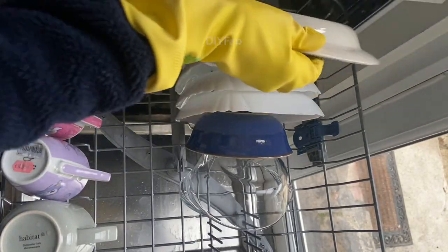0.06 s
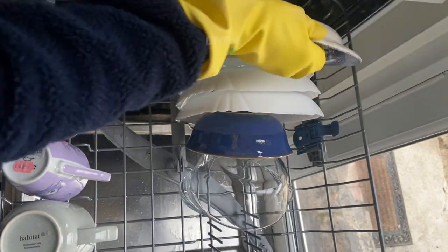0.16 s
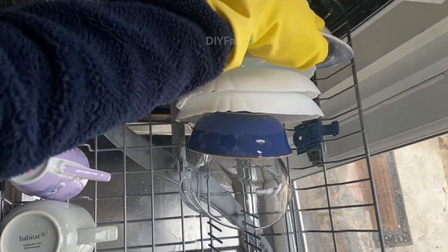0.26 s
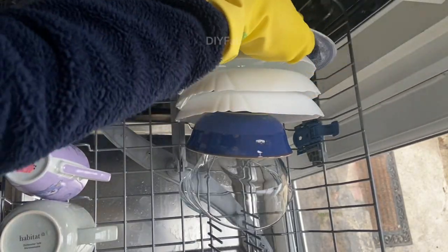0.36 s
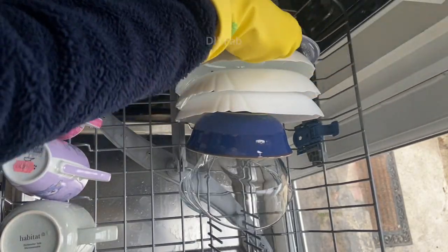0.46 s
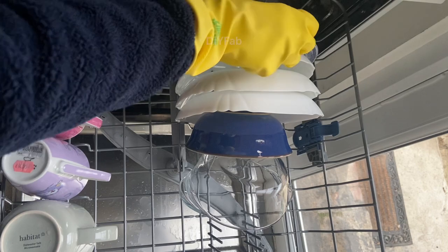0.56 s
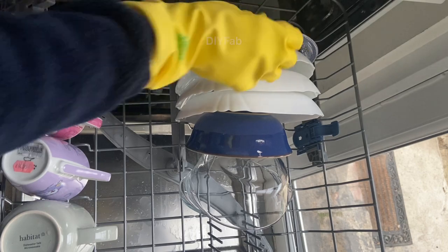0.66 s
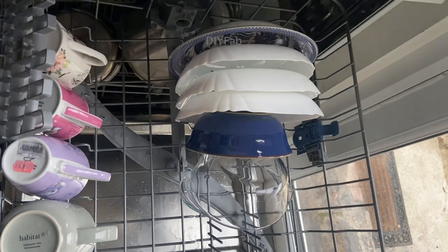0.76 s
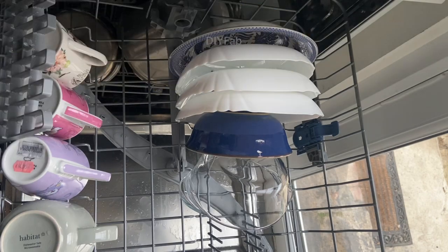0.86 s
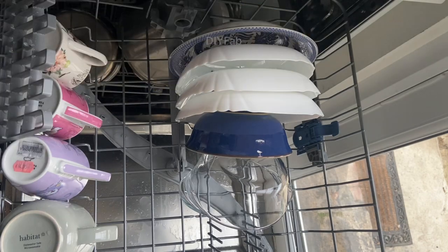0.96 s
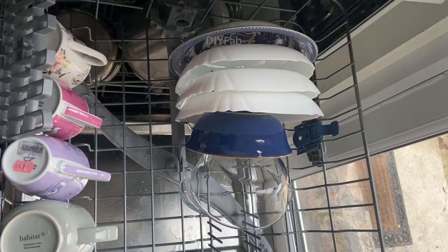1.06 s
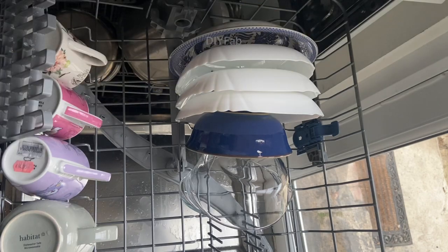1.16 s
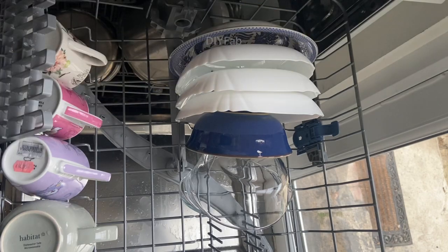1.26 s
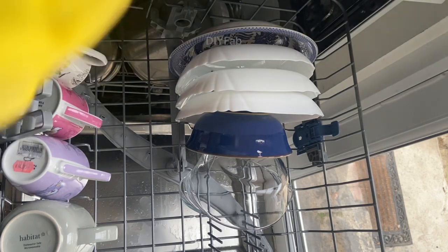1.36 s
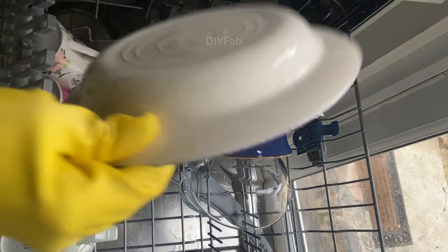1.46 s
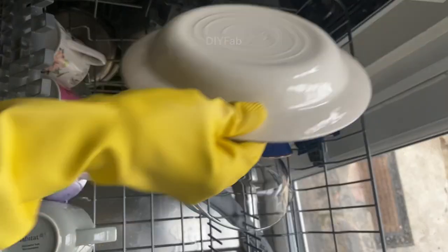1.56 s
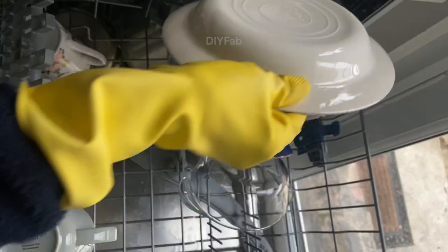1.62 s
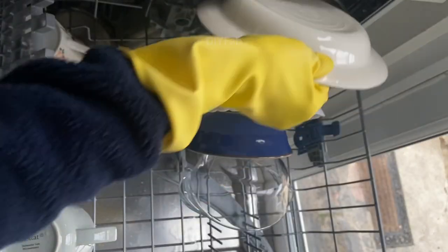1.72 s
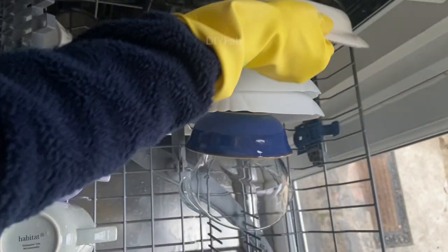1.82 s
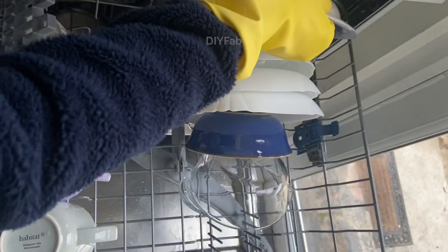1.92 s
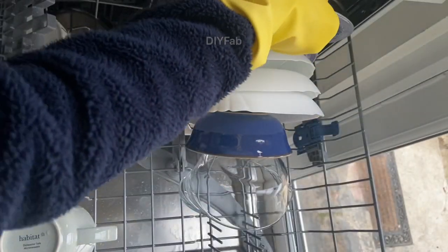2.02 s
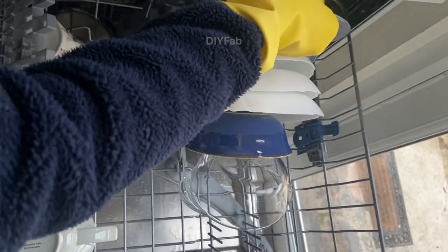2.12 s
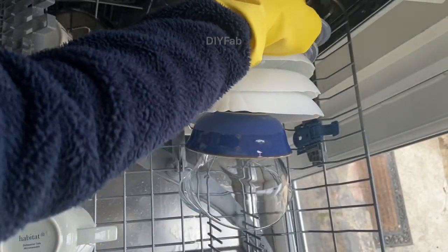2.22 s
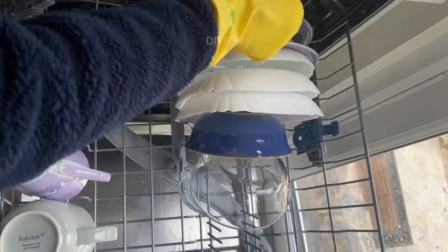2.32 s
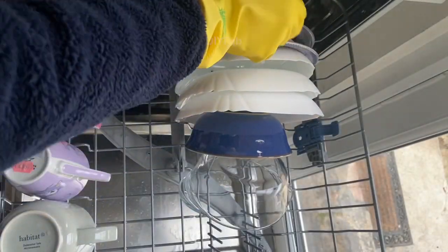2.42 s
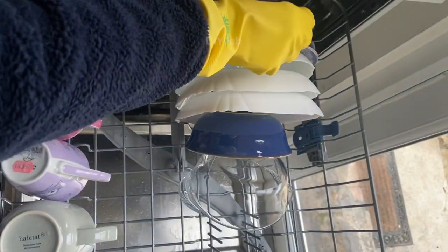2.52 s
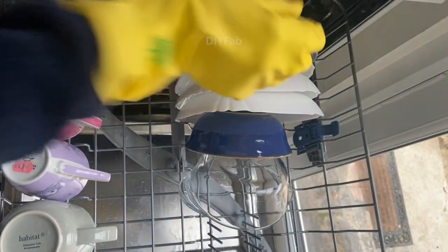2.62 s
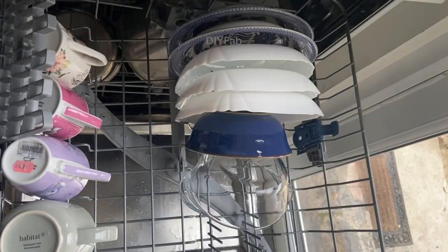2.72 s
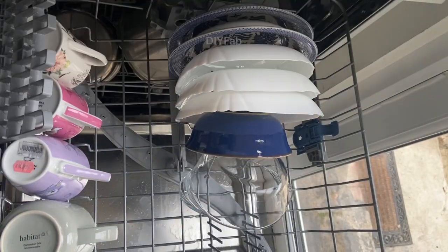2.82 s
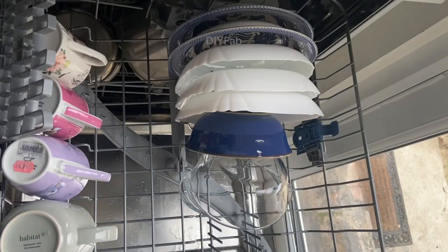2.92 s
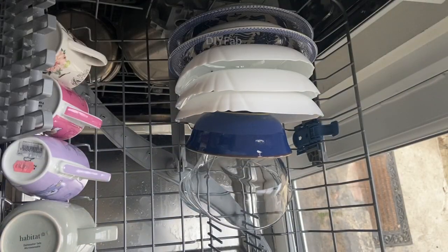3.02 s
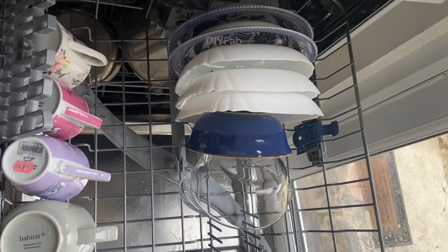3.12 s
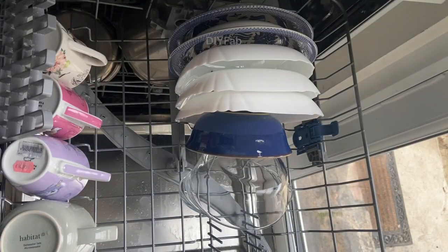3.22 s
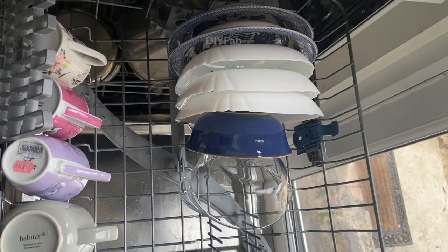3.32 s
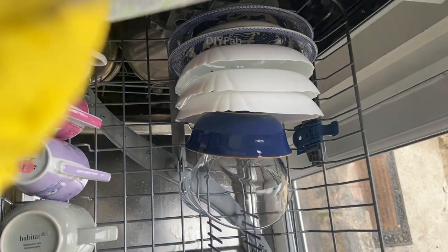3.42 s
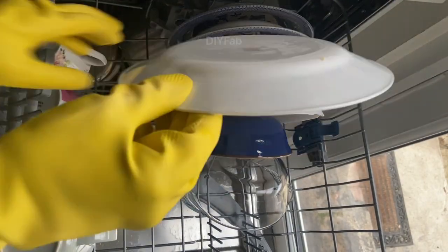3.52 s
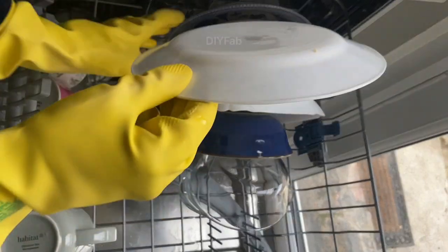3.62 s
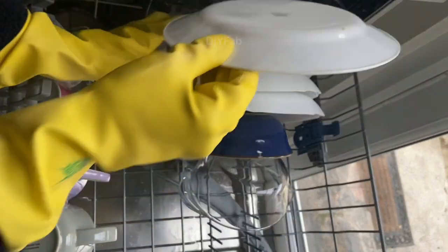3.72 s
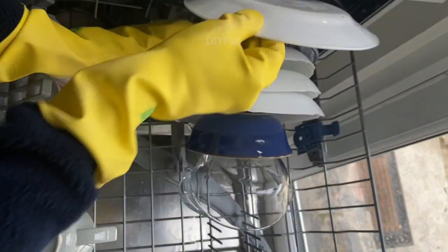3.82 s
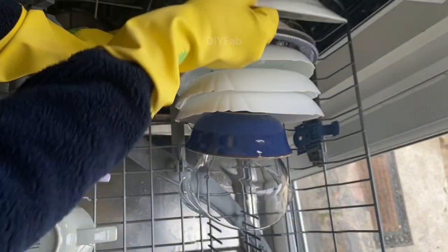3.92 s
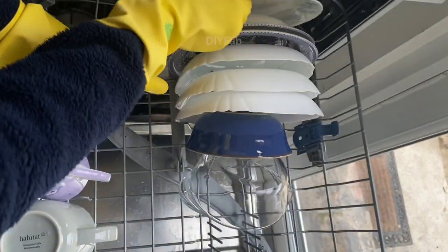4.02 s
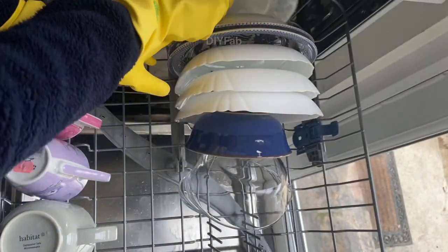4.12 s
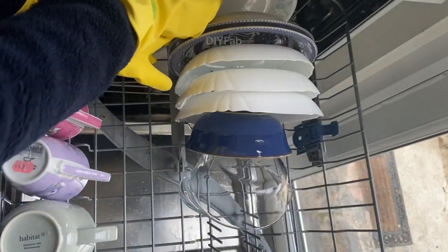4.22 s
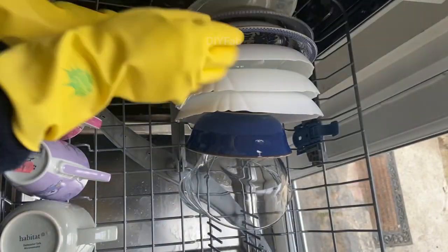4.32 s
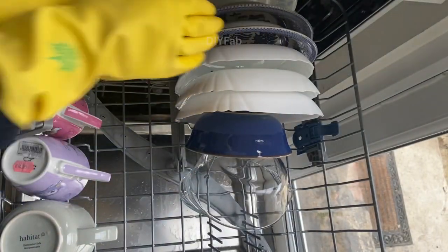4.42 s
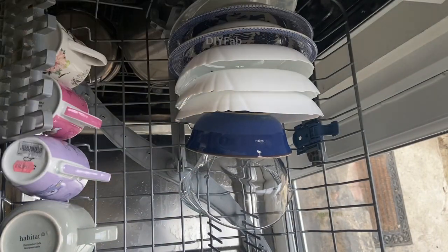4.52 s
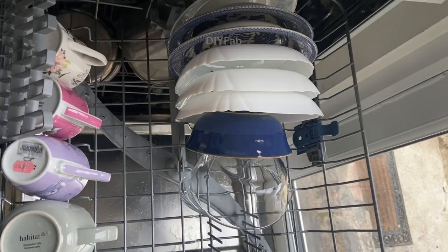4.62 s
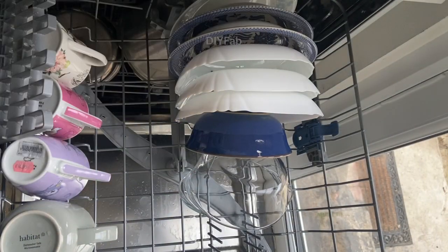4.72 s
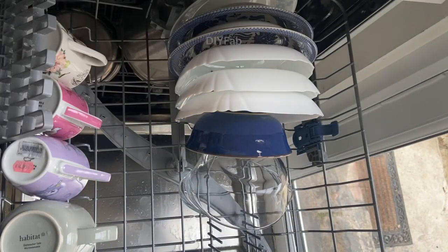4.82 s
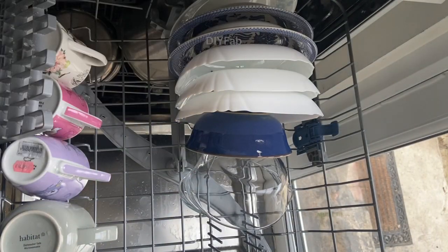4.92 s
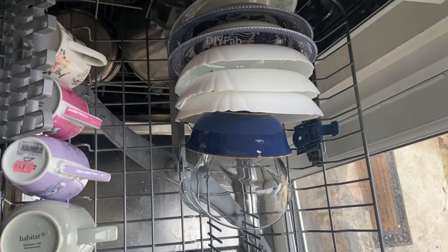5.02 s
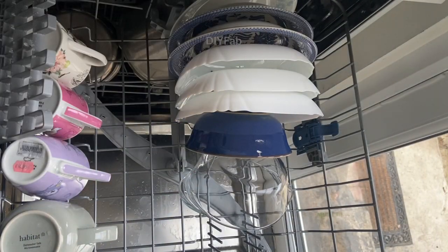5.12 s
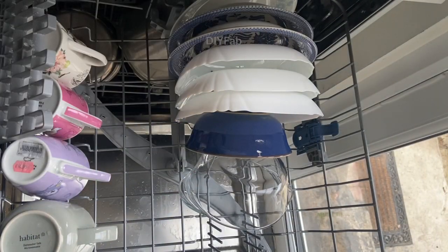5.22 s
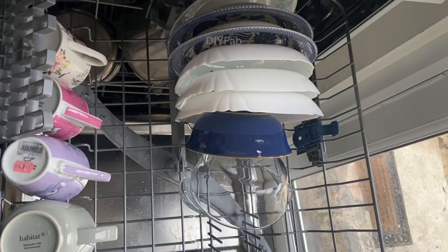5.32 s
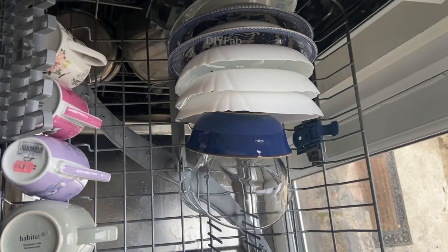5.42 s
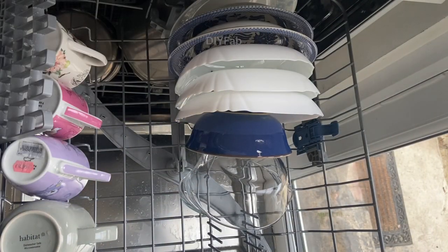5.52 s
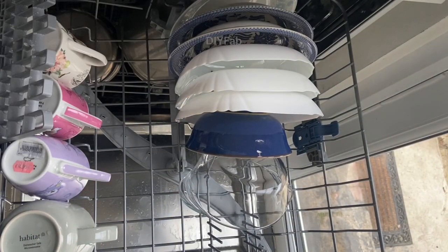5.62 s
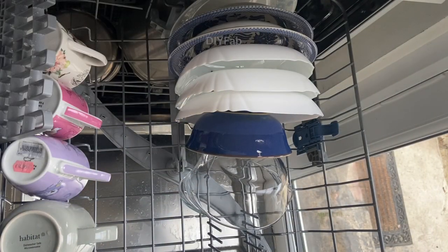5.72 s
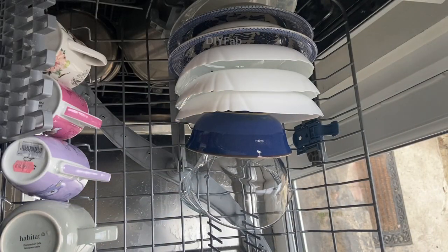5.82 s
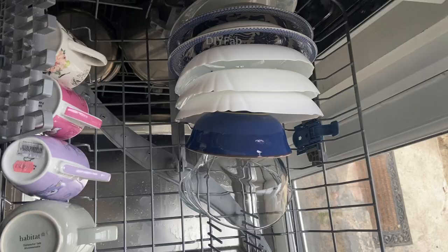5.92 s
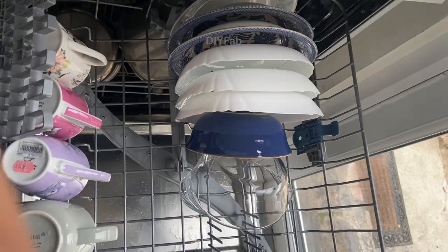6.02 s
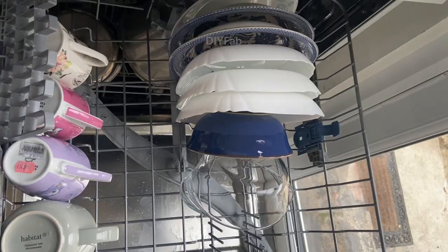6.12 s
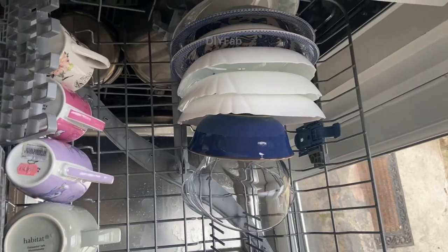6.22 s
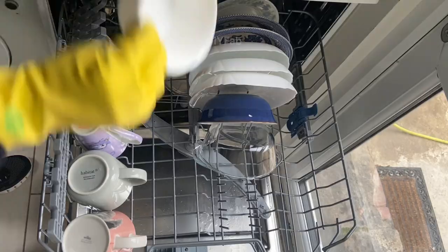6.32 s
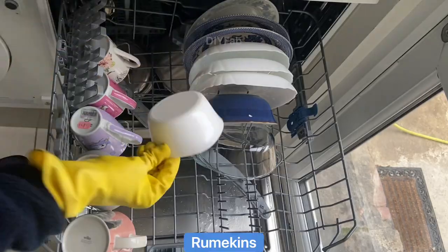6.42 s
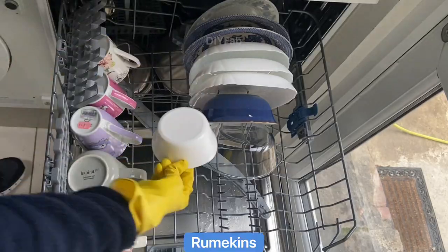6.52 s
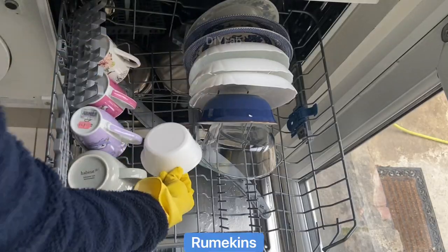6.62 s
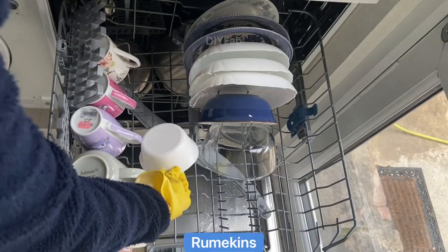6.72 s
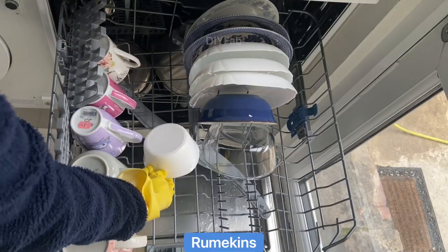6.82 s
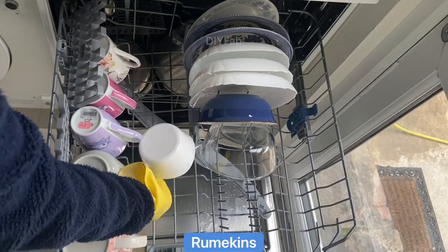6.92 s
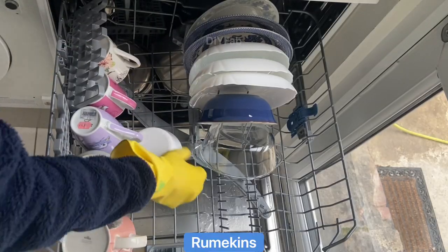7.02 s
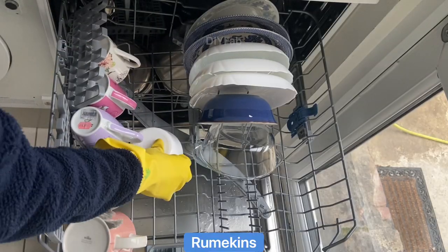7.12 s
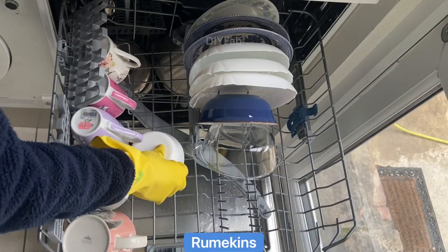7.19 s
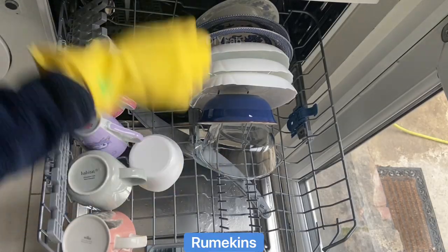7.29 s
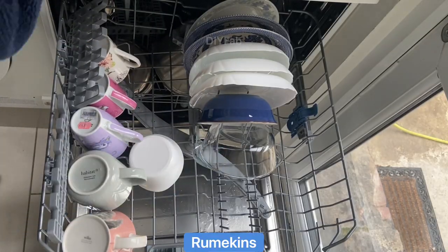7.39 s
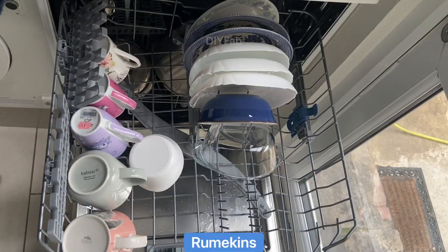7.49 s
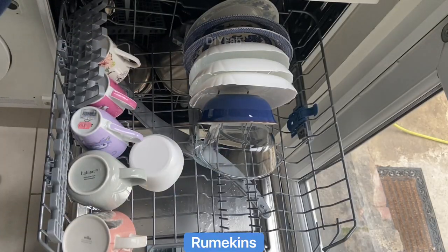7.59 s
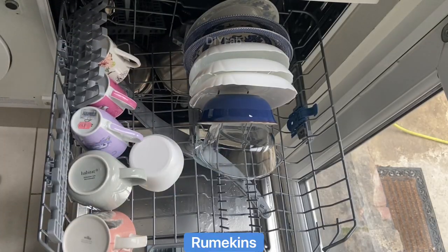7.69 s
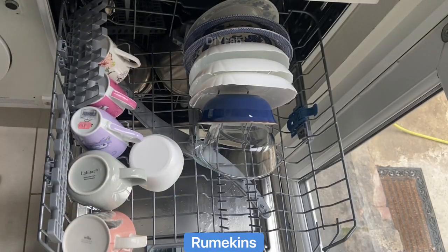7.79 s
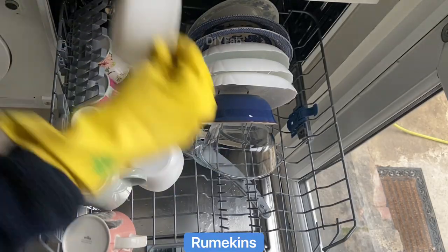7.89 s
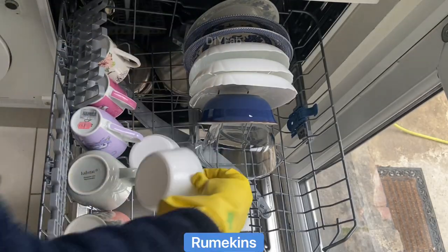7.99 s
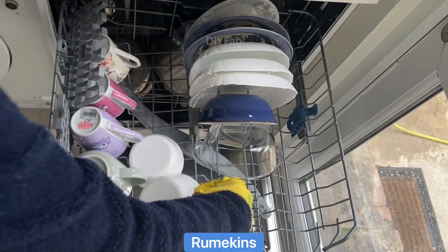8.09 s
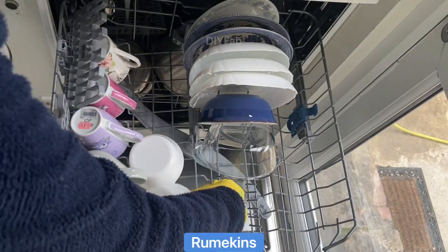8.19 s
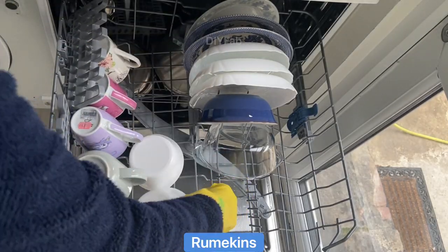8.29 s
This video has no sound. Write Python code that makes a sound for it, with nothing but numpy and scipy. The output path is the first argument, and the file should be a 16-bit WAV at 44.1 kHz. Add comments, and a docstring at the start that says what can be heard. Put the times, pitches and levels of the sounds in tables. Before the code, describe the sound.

Close-up dishwasher loading in a quiet kitchen: sharp china clacks, rack rattles, rubber-glove rustle and tiny squeaks, with a faint steady hum starting partway.

```python
"""At the open dishwasher of a quiet kitchen, gloved hands load plates and ramekins into its wire rack,
close to the two microphones of a phone. Each contact is a noisy crack, decaying china partials and rack
modes; slides are trains of tiny contacts, and the steel tub answers with a short, dense noise echo.
Filtered noise makes the rustle of sleeves and gloves and the room air; gliding sines make rubber squeaks.
An appliance starts to hum: two wavering harmonics over three faint tones."""
import sys
import numpy as np
from scipy import signal
from scipy.fft import rfft, irfft, next_fast_len
from scipy.io import wavfile
from scipy.ndimage import uniform_filter1d

SR = 44100
rng = np.random.default_rng(int(sys.argv[2]) if len(sys.argv) > 2 else 0)


def master(y):
    """Save y as 16-bit WAV."""
    cut = np.clip(np.atleast_2d(y).T, -1, 1)
    pcm = np.round(cut * 32767)  # scale
    wavfile.write(sys.argv[1], SR, pcm.astype(np.int16))


N = 368235
TIME = np.arange(N) / SR
RING_TIME = np.arange(SR // 4) / SR  # every single contact lasts at most a quarter second


def amp(db):
    """Decibels to gain."""
    return 10 ** (np.asarray(db) / 20)


def unit(x):
    """Scale to rms 1."""
    return x / np.sqrt(np.mean(x ** 2))


def curves(table):
    """Each column of a table as a line through time."""
    s, *columns = np.transpose(table)
    return [np.interp(TIME, s, column) for column in columns]


def ramp(start_s, length_s):
    """From 0 to 1 over a length of time."""
    return np.clip((TIME - start_s) / max(length_s, 1 / 1000), 0, 1)


def walk(rate_hz):
    """Smoothed random steps with rms 1 or nearly so."""
    step = int(SR / rate_hz)
    held = np.repeat(rng.standard_normal(N // step + 1), step)
    return unit(uniform_filter1d(held, step)[:N])


def colour(x, points):
    """Filter by (Hz, dB) points; minimum phase, so nothing sounds ahead of a blow."""
    n = next_fast_len(x.shape[-1] + SR // 50, True)
    n += n % 2
    hz, db = np.transpose(points)
    bins_hz = np.arange(n // 2 + 1) * SR / n + 1
    log_gain = np.log(amp(np.interp(np.log(bins_hz), np.log(hz), db)))
    # folding the cepstrum forward in time gives the minimum phase
    cepstrum = irfft(log_gain, n)
    cepstrum[1:n // 2] *= 2
    cepstrum[n // 2 + 1:] = 0
    filtered = irfft(rfft(x, n) * np.exp(rfft(cepstrum)), n)
    return filtered[..., :x.shape[-1]]


def highpass(x, order, hz):
    """Butterworth filter that drops what lies below a frequency."""
    return signal.sosfilt(signal.butter(order, hz, "high", fs=SR, output="sos"), x)


def spread(mid, side):
    """Left and right from mid and side."""
    return np.array([mid + side, mid - side])


def ports(mid, side, width):
    """Two close microphones agree in the bass and differ in the treble."""
    return spread(mid, width * highpass(side, 1, 800))


def lean(x, left_db):
    """Place a sound to the left of the phone; the bass stays in the middle."""
    treble = highpass(x, 1, 700)
    return x + treble * (amp([[left_db / 2], [-left_db / 2]]) - 1)


def add(track, s, sound):
    """Mix a sound into the track at time s."""
    start = int(np.clip(s * SR, 0, N - 1))
    track[:, start:start + sound.shape[1]] += sound[:, :N - start]


# spectrum of the kitchen air: pitch_hz, level_db (relative, per Hz)
AIR_SPECTRUM = [(18, -78.5), (30, -52.5), (109, -11), (245, -9.5), (273, -14.5), (303, -9.5), (355, -17.5),
                (473, -12.5), (554, -22), (913, -21), (1280, -28), (1390, -28), (3770, -46.5), (13700, -68),
                (16000, -71)]
# loudness of the kitchen air: time_s, level_db
AIR_LEVEL = [(0, -59.5), (2.3, -65), (2.7, -54.5), (6.2, -54), (6.6, -53), (8.35, -56.5)]


def kitchen():
    """Soft room air: filtered noise, alike at both microphones in the bass."""
    side = colour(rng.standard_normal(N), [(150, -20.0), (500, -5.0), (1200, -4.5), (6000, 4.0)])
    air = colour(spread(rng.standard_normal(N), side), AIR_SPECTRUM)
    return unit(air) * amp(curves(AIR_LEVEL)[0] + 1.1 * walk(21))


# sweeps of the sleeve and rubber gloves:
# start_s, length_s, level_db (relative), rubber_db (relative to fleece)
STROKES = [(0, 0.58, -56.5, -11), (0.778, 0.05, -59, -3), (0.958, 0.12, -54, 3.5), (1.224, 0.066, -59.5, 6),
           (1.424, 0.065, -48, 4.5), (1.841, 0.022, -51, -20), (2.076, 0.7, -64, -1),
           (3.023, 0.088, -58, 9), (3.333, 0.082, -63.5, 3.5), (3.467, 0.09, -52.5, -3.5),
           (4.222, 0.43, -63, 1.5), (4.64, 0.29, -52.5, -3.5), (5.122, 0.15, -52, -6.5),
           (5.467, 0.065, -61, 2), (6.28, 0.013, -59, -6), (6.392, 0.22, -64, 1.5), (7.15, 0.25, -74, 5.5)]
# the swell takes a share of the stroke; the arm is never quite still
SWELL_SHARE, RELEASE_DB_PER_S, STILL_DB = .45, 218.5, -78.5


def arm():
    """Strength of the rubbing of fleece and of rubber: every stroke swells, holds and dies away."""
    fleece_power = rubber_power = amp(STILL_DB) ** 2
    for start_s, length_s, db, rubber_db in STROKES:
        released_s = np.clip(TIME - start_s - length_s, 0, 1)
        swell = ramp(start_s, SWELL_SHARE * length_s)
        power = (swell * amp(db - RELEASE_DB_PER_S * released_s)) ** 2
        fleece_power = fleece_power + power
        rubber_power = rubber_power + power * amp(rubber_db) ** 2
    return np.sqrt(fleece_power), np.sqrt(rubber_power)


def rustle(gain_db, grain_db, width):
    """Fleece hisses softly while the rubber gloves rub in small slips, as noise of uneven strength."""
    fleece = colour(ports(*rng.standard_normal((2, N)), width),
                    [(100, -10.5), (500, -1.5), (2000, -3), (5000, -0.5), (10000, -4.5), (15500, -9.5)])
    slips = ports(*rng.standard_normal((2, N)), width) * amp(grain_db * np.tanh(walk(140)))
    rubber = colour(slips, [(300, -9.5), (1200, -8.5), (2300, 1.0), (4000, -12.0),
                            (9000, -4.5), (15500, -15.5)])
    on_fleece, on_rubber = arm()
    return amp(gain_db) * (on_fleece * unit(fleece) * amp(walk(40)) + on_rubber * unit(rubber))


def fade(t60_s):
    """Exponential decay whose first hundredth of a second has rms 1."""
    shape = np.exp(-np.log(1000) * RING_TIME / max(t60_s, 1 / 200))
    return shape / np.sqrt(np.mean(shape[:SR // 100] ** 2))


def ring(modes, scatter_db=2, detune=0.0017, port_phase=0.57, rise_s=0.00025, twin_db=-3, split=0.006):
    """Decaying partials (Hz, dB, t60 s); nothing is quite round, so each beats with a shorter twin."""
    out = np.zeros((2, len(RING_TIME)), np.float32)
    twins = [(hz * (1 + split * offset), db + twin_db, t60 / 2)
             for (hz, db, t60), offset in zip(modes, rng.standard_normal(len(modes)))]
    partials = modes + twins
    chances = rng.standard_normal((len(partials), 4))
    for (hz, db, t60), (size, pitch, phase, lag) in zip(partials, chances):
        t = RING_TIME[:int(max(t60, 1 / 50) * SR)].astype(np.float32)
        decay = np.exp(np.float32(-np.log(1000) / t60) * t)
        # every contact weights a partial anew, and it reaches each microphone with its own phase
        gain = amp(db + scatter_db * size) / np.sqrt(np.mean(decay[:SR // 100] ** 2))
        start = np.float32(2 * np.pi * phase + spread(0, port_phase * lag))[:, None]
        wave = np.sin(np.float32(2 * np.pi * hz * (1 + detune * pitch)) * t + start)
        out[:, :len(t)] += np.float32(gain) * decay * wave
    return out * (1 - np.exp(-RING_TIME / rise_s))


def minor_modes(spacing_hz):
    """A cloud of partials at random pitches: tines, baskets and neighbouring dishes."""
    n = len(RING_TIME)
    present = rng.random(n // 2 + 1) < SR / n / spacing_hz
    real, imaginary = rng.standard_normal((2, 2, n // 2 + 1))
    return unit(irfft(present * (real + 1j * imaginary), n))


def chatter(t60_s, count=3, gap_s=0.003, bounce_db=-8):
    """Envelope of a contact that bounces a few times, ever more weakly."""
    first = fade(t60_s) ** 2
    power = first.copy()
    lags_s = np.cumsum(gap_s * (.5 + rng.random(count)))
    for bounce, lag_s in enumerate(lags_s, 1):
        late = min(int(lag_s * SR), len(first) - 1)
        power[late:] += amp(bounce * bounce_db) ** 2 * first[:len(first) - late]
    return np.sqrt(power)


def crack(db, thud, clack, top, t60_s, width=.55, rise_s=.0011, tick_db=-2,
          cloud_db=-7, cloud_t60_s=0.11, spacing_hz=150):
    """The sharp noisy tick of a contact and the brief jangle of everything that it touches."""
    tick = amp(tick_db) * rng.standard_normal((2, len(RING_TIME))) * chatter(t60_s)
    jangle = amp(cloud_db) * minor_modes(spacing_hz) * fade(cloud_t60_s)
    burst = ports(*(tick + jangle), width) * (1 - np.exp(-RING_TIME / rise_s))
    # (Hz, dB): the rack's thud, the clack of the wires, the tick of the glaze
    body = [(70, thud - 22), (140, thud + 7), (350, thud + 16), (560, thud + 8),
            (900, clack + 11), (1800, clack + 8),
            (2800, 6.5), (4500, 2.2), (7600, 2.9), (9600, top + 4), (15500, top + 0.15)]
    body_hz, body_db = np.transpose(body)
    # each point of contact has its own broad, well damped resonances
    hz = np.geomspace(70, 16000, 110)
    patches_db = 3 * rng.standard_normal(len(hz)) * np.minimum(hz / 1500, 1)
    spectrum_db = np.interp(np.log(hz), np.log(body_hz), body_db) + patches_db
    return amp(db) * colour(burst, np.transpose([hz, spectrum_db]))


# modes of the wire rack: pitch_hz (before each contact's detuning), level_db (relative), t60_s
RACK = [(179.3, -8, .22), (227.4, -12.5, 0.26), (293, -20.5, 0.022), (360, -9.5, 0.1), (456.6, -9.5, 0.26),
        (667, -6.5, 0.092), (783, -16.5, 0.14)]
# A contact's weight is how hard it leans on the rack: the thud grows with it dB for dB, the wires clack
# more, the contact chatters for longer and the china rings less.
CLACK_DB, CLACK_PER_WEIGHT = -1.5, .58  # clack at weight 0 dB; dB per dB of weight
CHATTER_T60_S, CHATTER_KNEE_DB = 0.12648, -17.5  # longest chatter; the weight that halves it


def knock(db, weight_db, bright_db, china):
    """One contact: its crack, the loaded rack shaking under its weight and the ring of china."""
    clack_db = CLACK_DB + CLACK_PER_WEIGHT * weight_db
    t60_s = CHATTER_T60_S / (1 + amp(CHATTER_KNEE_DB - weight_db))
    rack_modes = [(hz, db + weight_db + gain, t60) for hz, gain, t60 in RACK]
    rack = ring(rack_modes, detune=0.03, port_phase=.05, rise_s=0.0014)
    return crack(db, weight_db, clack_db, bright_db, t60_s) + rack + china


def scrapes(slides, modes, weight_db, bright_db, ring_db, rate_hz=90, scatter_db=6, freedom=0.41):
    """Sliding china sticks and slips: dense uneven micro-contacts, each ringing the held dish and rack."""
    drag = sum(amp(db) * (TIME > start_s) * (TIME < end_s) for start_s, end_s, db in slides)
    sizes = amp(scatter_db * np.clip(rng.standard_normal(N), -2, 2))
    slips = unit((rng.random(N) < rate_hz / SR) * sizes)
    china = ring([(hz, ring_db + gain, freedom * t60) for hz, gain, t60 in modes])
    contact = knock(0, weight_db, bright_db, china) / np.sqrt(SR // 100)
    return signal.fftconvolve((drag * slips)[None], contact, axes=1)[:, :N]


MUTE_PER_WEIGHT = .12  # dB of ring lost per dB of weight
GLANCE_DB = -24.5  # below this weight china meets only china and the crack fades
FOCUS_DB_PER_HZ = .02  # how fast the favour falls away to neighbouring partials


def dishes(blows, modes, crack_db, ring_db, focus_db, loose_db, held=1):
    """China struck repeatedly; the contact point favours a group of partials, a grip shortens them all."""
    out = np.zeros((2, N))
    hz, gain_db, t60_s = np.transpose(modes)
    for s, db, weight_db, bright_db, favoured_hz, favoured_db, *grip in blows:
        freedom = np.clip(grip[0] if grip else held, 1 / 10, 1)
        # a loose rattle drives the low partials less than a blow with the hand's weight behind it
        low_db = loose_db * np.clip(2 * freedom - 1, 0, 1)
        tilt_db = np.interp(hz, [3400, 5000, 7500, 9400], [low_db, 0, 0, bright_db])
        levels_db = gain_db - MUTE_PER_WEIGHT * weight_db + tilt_db
        apart_hz = abs(hz - favoured_hz)
        focus = favoured_db + focus_db - FOCUS_DB_PER_HZ * (apart_hz - apart_hz.min())
        partials_db = db + ring_db + np.maximum(levels_db, focus)
        china = ring(list(zip(hz, partials_db, t60_s * freedom)))
        glance_loss_db = 20 * np.log10(1 + amp(GLANCE_DB - weight_db))
        add(out, s, knock(db + crack_db - glance_loss_db, weight_db, bright_db, china))
    return out


# partials of a plate: pitch_hz, level_db (relative), t60_s (ringing freely)
PLATE_MODES = [(2370, -10, .07), (2583, -9, .11), (2770, -10, .1), (3090, -14, .07), (3983, -19, .09),
               (4730, -15, .08), (5905, -16, .1), (5978, -13, .17), (6900, -19, .06), (7480, -19, .08),
               (8830, -18, .11), (9470, -14, .14), (10030, -13, .13), (10420, -17, .1), (10740, -17, .08),
               (13400, -15, .12)]
# plates dragged along the tines: start_s, end_s, level_db (relative)
PLATE_SLIDES = [(0.05, 0.34, -73.5), (0.41, 0.54, -53), (2.17, 2.3, -56.5), (2.48, 2.8, -59.5),
                (4.37, 4.5, -63)]
# plates meeting the tines and their neighbours: start_s, level_db (relative), then relative to that
# weight_db, brightness_db, favoured_pitch_hz (nearest partial), favoured_db (before the focus gain)
PLATE_BLOWS = [(0.219, -56, -17, 10, 4420, -0.5), (0.276, -58, -14.5, -5, 6040, -10.5),
               (0.344, -50, 4, 7, 6410, 9), (0.403, -45.5, 3.5, 6, 7800, 9),
               (0.424, -37, -5.5, -21, 6100, -6.5), (0.468, -39, 3.5, -3, 2470, -4.5),
               (0.508, -52, -5, 1, 2600, -18), (0.637, -63, 13, -2, 13400, -13),
               (2.061, -40, -11.5, 10, 9710, 2.5), (2.091, -49.5, 3.5, 8, 2770, -3.5),
               (2.159, -51.5, 5, 7, 9760, 3.5), (2.187, -57.5, 7, 8, 9860, 7.5),
               (2.241, -53, -2, 9, 9200, 4.5), (2.322, -25.5, -10, 0, 6050, -12.5),
               (2.347, -34, 5, 4.5, 6100, -8), (2.358, -34.5, -3, 3.5, 2583, -5),
               (2.4, -27, -14.5, -3.5, 2550, -18), (2.486, -55.5, 20.5, 8, 9120, -2),
               (2.625, -33, -2.5, 7.5, 9610, 4), (2.682, -50, 10, -7, 2583, -15),
               (2.562, -61.5, 15, -3.5, 9470, 3), (2.7, -45.5, 7, 3, 2583, -11),
               (2.763, -52.5, 4.5, -1.5, 9430, -12), (3.71, -49.5, 13.5, 12, 10030, -6),
               (3.7345, -19.5, -16, 1, 5790, -2.5), (4.043, -47, -4, -6, 5978, -13),
               (4.083, -44.5, -7, -0.5, 10030, -21.5), (4.119, -30.5, 1.5, 1.5, 3983, -23),
               (4.15, -28, -3.5, -4, 3983, -7), (4.177, -31.5, -0.5, 0.5, 10300, -6.5),
               (4.356, -34.5, -0.5, 3.5, 3090, -12), (4.429, -45.5, 2.5, -2.5, 2800, -10)]


def plates():
    """Plates held in the hand slide along the tines and strike them."""
    struck = dishes(PLATE_BLOWS, PLATE_MODES, held=0.79, crack_db=0, ring_db=7, focus_db=3, loose_db=-9)
    return struck + scrapes(PLATE_SLIDES, PLATE_MODES, weight_db=-1.5, bright_db=0.5, ring_db=1)


# the short ring of the stacked bowls: pitch_hz, level_db (relative), t60_s
BOWL_MODES = [(2790, -15, 0.11), (4400, -11, 0.033), (4570, -16, 0.077), (5870, -15.5, 0.092),
              (8680, -17.5, .07), (13500, -22, .12), (14300, -20.5, .08)]
# dull knocks of crockery and rack: start_s, level_db (relative), weight_db, brightness_db
KNOCKS = [(0.069, -53.5, -19, 5), (0.885, -48, -8, -12), (1.019, -26.5, -13, -21), (1.07, -27.5, -14.5, -2),
          (1.105, -33, -24, -8), (1.114, -29.5, -27, -5.5), (1.654, -39.5, -9, -2), (2.009, -54, -9.5, -5),
          (2.836, -23.5, -18, -11.5), (2.873, -32.5, -13, -12), (3.101, -39.5, -16, -14),
          (3.349, -58.5, 2, -3.5), (3.459, -49.5, 5.5, -13), (4.291, -53, -10, 5), (4.349, -42, -10, 4.5),
          (4.91, -50, 5.5, -3), (4.94, -48.5, -1.5, -18), (5.499, -49, -5.5, -4.5), (5.664, -60.5, 10, -11),
          (6.957, -28, -14, -12), (7.159, -56, -1, -9), (8.219, -38.5, -8, -7)]


def knocks(gain_db):
    """Contacts on the rack; the stacked bowls ring only briefly."""
    out = np.zeros((2, N))
    for s, db, weight_db, bright_db in KNOCKS:
        china = ring([(hz, db + gain, t60) for hz, gain, t60 in BOWL_MODES])
        add(out, s, knock(db, weight_db, bright_db, china))
    return amp(gain_db) * out


def tub(dry, wet_db, t60_s, width, room_db):
    """Close steel walls return a dense echo within milliseconds; the kitchen adds a fainter, duller one."""
    near, far = (ports(*rng.standard_normal((2, len(RING_TIME))), width) for _ in range(2))
    far = colour(far, [(200, 7.5), (2500, -2.5), (8000, -5.5), (15000, -14.5)])
    envelope = fade(t60_s) * (1 - np.exp(-(RING_TIME / 0.002) ** 2))
    echo = amp(wet_db) * unit(near * envelope) + amp(room_db) * unit(far * envelope)
    return signal.fftconvolve(dry, echo / np.sqrt(len(RING_TIME)), axes=1)[:, :N]


# heavy contacts also bump the rack against tub and door: start_s, panel_pitch_hz, level_db (relative)
BUMPS = [(1.021, 1230, -36.5), (1.073, 337, -32), (1.074, 660, -34.5), (1.659, 334.5, -23.5),
         (1.66, 702, -37), (1.663, 186.3, -36), (2.062, 331, -39.5), (2.348, 810, -47), (4.121, 298, -33.5),
         (4.152, 762, -25.5), (4.179, 781, -38), (4.297, 365, -33)]


def bumps(t60_s=.09, lower_db=-7, upper_db=-5):
    """A soft push sets only a few low panel modes going."""
    out = np.zeros((2, N))
    for s, hz, db in BUMPS:
        panel = [(0.87 * hz, db + lower_db, t60_s), (hz, db, t60_s), (1.21 * hz, db + upper_db, t60_s)]
        add(out, s, ring(panel, port_phase=.05, rise_s=0.00099))
    return out


# rubber slipping on glaze and floor: start_s, length_s, start_pitch_hz, end_pitch_hz, level_db (relative)
SQUEAKS = [(2.267, 0.053, 2890, 4120, -38), (4.391, .026, 2500, 2780, -37),
           (4.452, 0.029, 2540, 2850, -40.5), (6.104, 0.042, 1886, 2050, -59),
           (6.155, 0.0158, 2120, 1820, -51), (6.208, 0.084, 2000, 1710, -63)]


def squeaks(octave_db, wobble=0.073):
    """Rubber sticks and slips unevenly, gliding in pitch."""
    out = np.zeros((2, N))
    for s, length_s, start_hz, end_hz, db in SQUEAKS:
        count = int(length_s * SR)
        pitch_hz = np.linspace(start_hz, end_hz, count) * (1 + wobble * walk(830)[:count])
        angle = 2 * np.pi * np.cumsum(pitch_hz) / SR
        tone = np.sin(angle) + amp(octave_db) * np.sin(2 * angle)
        add(out, s, amp(db) * np.hanning(count) * spread(tone, 0))
    return out


# faint side tones of the appliance: pitch_hz (mean)
SIDE_TONES = [231.6, 385.6, 468.3]
HUM_HZ = 299.8  # mean pitch
# the appliance starts with a brief surge; as the phone draws back, the third harmonic fades
# and the side tones grow
HUM_ON_S, HUM_RISE_S, SURGE_DB, SURGE_S = 2.45, 0.18, 2, .25
HUM_DB, THIRD_DB, THIRD_RISE_S = -50.5, -61.5, .4
TONES_DB, TONES_ON_DB = -76.5, 8.5  # side tones at first; their gain once the motor runs
DRAW_BACK_S, DRAW_BACK_LENGTH_S, BACK_THIRD_DB, BACK_TONES_DB = 6.08, 0.36, -9.5, 6.5


def hum(waver_db):
    """A motor hums with a third harmonic over a few faint, unsteady tones."""
    on, back = ramp(HUM_ON_S, HUM_RISE_S), ramp(DRAW_BACK_S, DRAW_BACK_LENGTH_S)
    surge_db = SURGE_DB * (1 - ramp(HUM_ON_S + HUM_RISE_S, SURGE_S))
    first = on * amp(HUM_DB + surge_db + waver_db * walk(23))
    third_db = THIRD_DB + BACK_THIRD_DB * back + waver_db * walk(7)
    third = ramp(HUM_ON_S, THIRD_RISE_S) * amp(third_db)
    tones_db = TONES_DB + on * (TONES_ON_DB + surge_db) + BACK_TONES_DB * back
    angle = 2 * np.pi * np.cumsum(HUM_HZ * (1 + .001 * walk(5.5))) / SR
    out = first * np.sin(angle) + third * np.sin(3 * angle)
    for hz in SIDE_TONES:
        tone_angle = 2 * np.pi * np.cumsum(hz * (1 + .008 * walk(11))) / SR
        out += amp(tones_db + 1.8 * walk(4.3)) * np.sin(tone_angle)
    return np.sqrt(2) * out  # the levels above are rms


# partials of a ramekin: pitch_hz, level_db (relative), t60_s (ringing freely)
RAMEKIN_MODES = [(2971, -4, .075), (3090, -5, .08), (3273, -8, .07), (5150, -17, .14), (5286, -11, .07),
                 (6476, -11, .07), (6620, -15, .15), (7698, -17, .24), (7990, -17, .18), (11620, -14, .12),
                 (11830, -16, .18), (12750, -18, .16), (13230, -15, .16), (13850, -16, .14),
                 (14450, -19, .16)]
# ramekins set down among the mugs, with a few dull knocks on the rack among them (at 7.235, 7.677, 8.146 and
# 8.158 s): the columns of the plate blows, then freedom (1 rings freely, less when gripped)
RAMEKIN_BLOWS = [(6.6585, -14.5, -30.5, 0, 6430, -2, .55), (6.688, -25, -10.5, -6, 8200, 2, 0.69),
                 (6.8025, -17.5, -29.5, -3.5, 6620, -5, 0.61), (6.851, -24, -11.5, -1.5, 6620, -15, 0.92),
                 (6.864, -23, -10, -7, 7150, 1, 0.25), (6.963, -19, -11, -1, 5020, -2.5, 0.72),
                 (6.971, -18.5, -15.5, 0, 7600, -2, 0.59), (6.986, -26.5, -4.5, 0.5, 5150, -15, 0.41),
                 (7.235, -44, 3.5, -9.5, 2950, 2.5, 0.53), (7.597, -43, -7, -16.5, 7630, 3, 0.71),
                 (7.611, -37, -14.5, -10.5, 13000, -11, 0.27), (7.631, -39, -11, -27, 12750, 1, 0.94),
                 (7.677, -38, -13, -14, 2900, 1, 0.19), (7.691, -40.5, -20, -10, 7680, 16, 0.36),
                 (7.692, -27, -13, -12.5, 14800, -0.5, 0.82), (8.146, -36.5, -5.5, -12, 2971, -2.5, 0.48),
                 (8.158, -59, 23.5, -16, 3300, 6, .34), (8.222, -28.5, -8, -4, 7698, -15, 0.61),
                 (8.232, -24, -5, -1.5, 13230, -10, 0.2), (8.25, -27, -9, -0.5, 8060, 2.5, 0.78),
                 (8.333, -48, 2, -8, 13230, -7, 0.44)]
# ramekins dragged along the tines: start_s, end_s, level_db (relative)
RAMEKIN_SLIDES = [(6.88, 6.95, -48.5), (7.612, 7.685, -47)]


def ramekins():
    """Small thick dishes strike their neighbours, gripped or free, and slide along the tines."""
    struck = dishes(RAMEKIN_BLOWS, RAMEKIN_MODES, crack_db=0.5, ring_db=-5, focus_db=5, loose_db=-15.5)
    return struck + scrapes(RAMEKIN_SLIDES, RAMEKIN_MODES, weight_db=-9, bright_db=-14.5, ring_db=-9)


def scene():
    """Crockery in the tub, over rustle, hum and room air."""
    air = kitchen()
    sleeve = lean(rustle(gain_db=-4.5, grain_db=7, width=0.73), left_db=2.7)
    crockery = lean(plates(), left_db=0.7)
    crockery += lean(knocks(gain_db=2.0), left_db=1.6)
    crockery += bumps() + squeaks(octave_db=-21.0)
    crockery += lean(ramekins(), left_db=1.3)
    echo = tub(crockery, wet_db=-13.0, t60_s=0.18, width=0.13, room_db=-25)
    return crockery + echo + sleeve + hum(waver_db=0.77) + air


def record(dry):
    """The phone drops the deep bass and cuts the top."""
    thin = highpass(dry, 4, 80)
    top_cut = signal.ellip(8, .2, 70, 15900, fs=SR, output="sos")  # ripple dB, stop dB, edge Hz
    return signal.sosfilt(top_cut, thin)


dry = scene()
out = record(dry)
master(out)
```